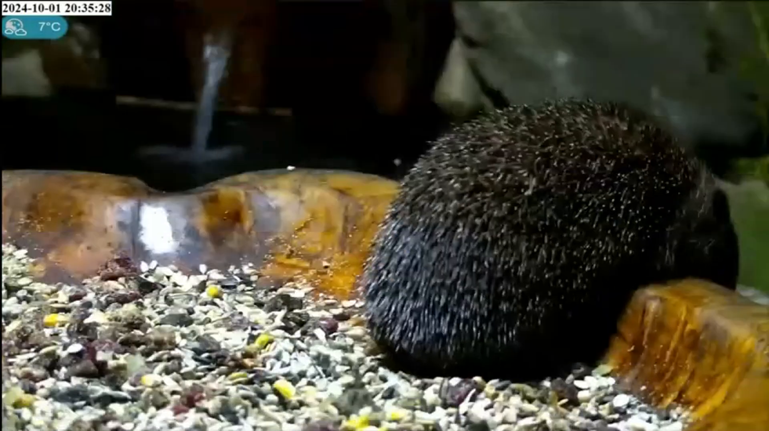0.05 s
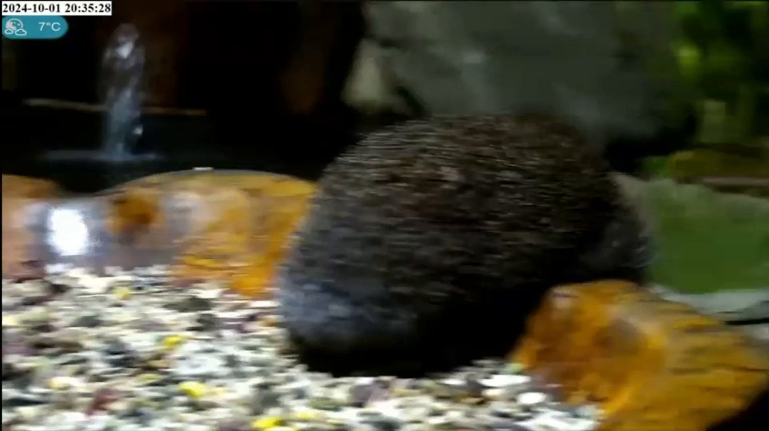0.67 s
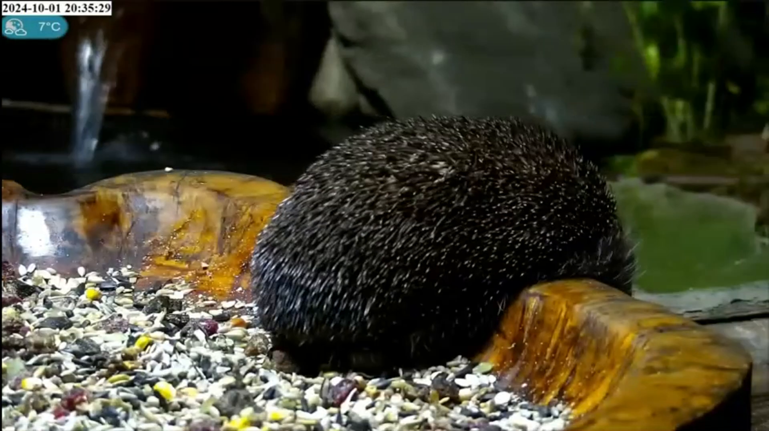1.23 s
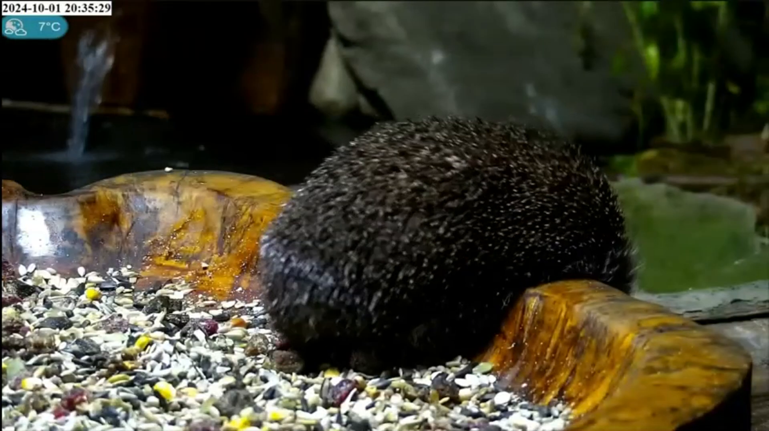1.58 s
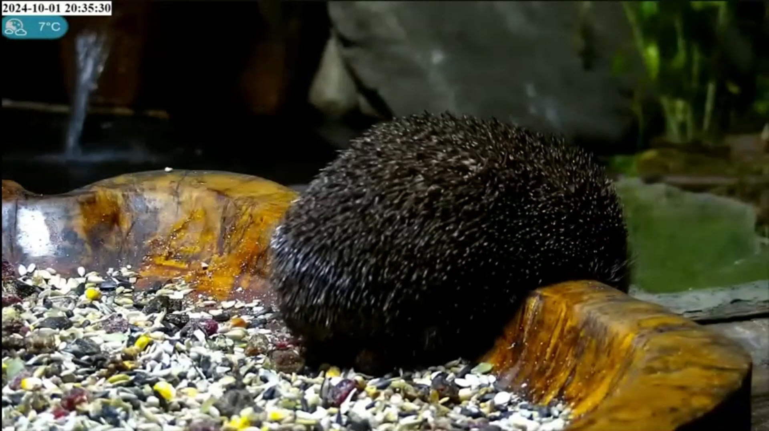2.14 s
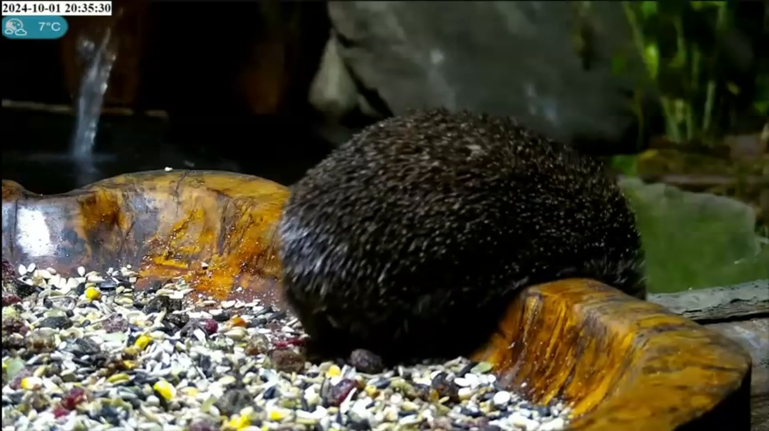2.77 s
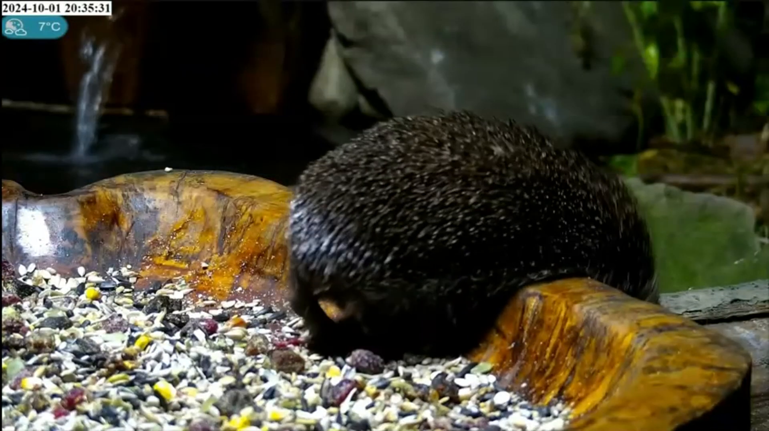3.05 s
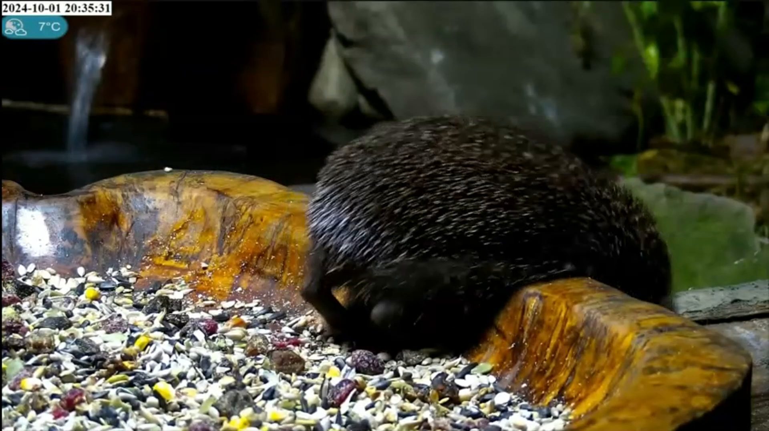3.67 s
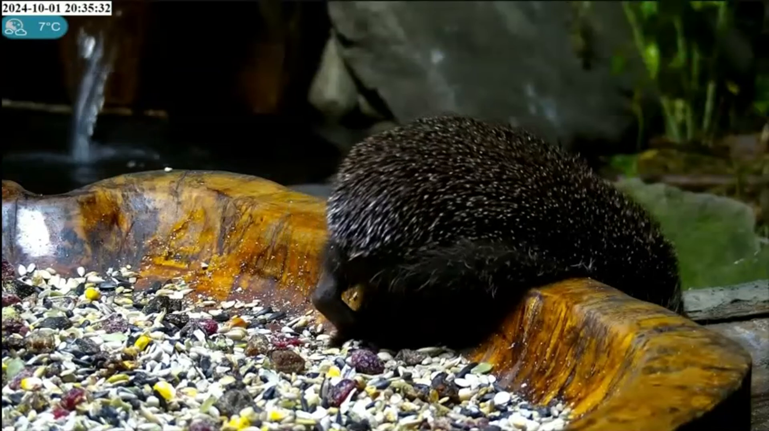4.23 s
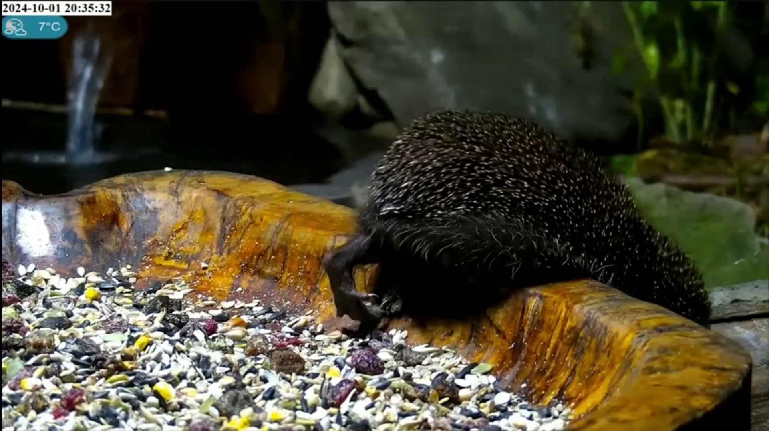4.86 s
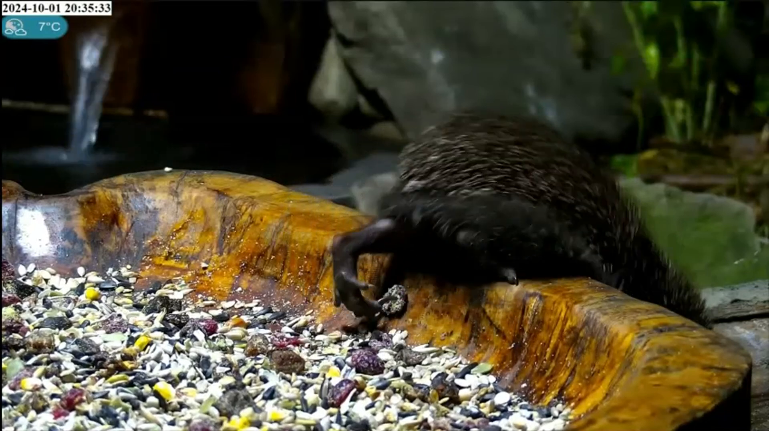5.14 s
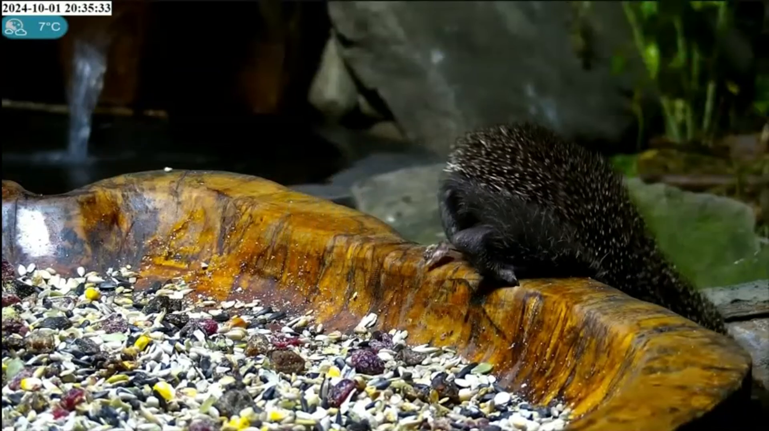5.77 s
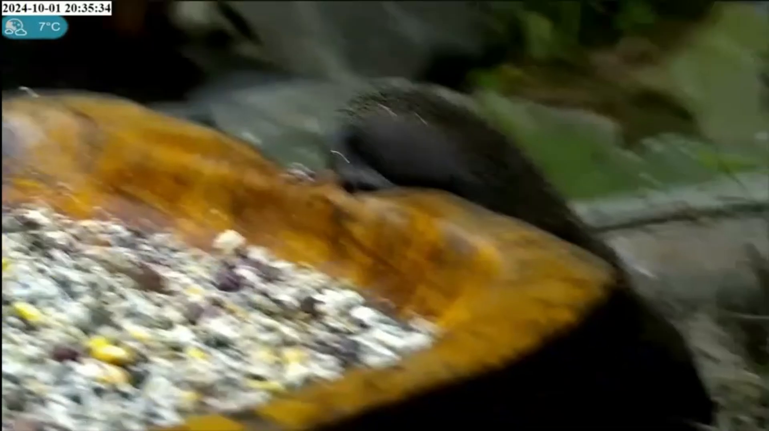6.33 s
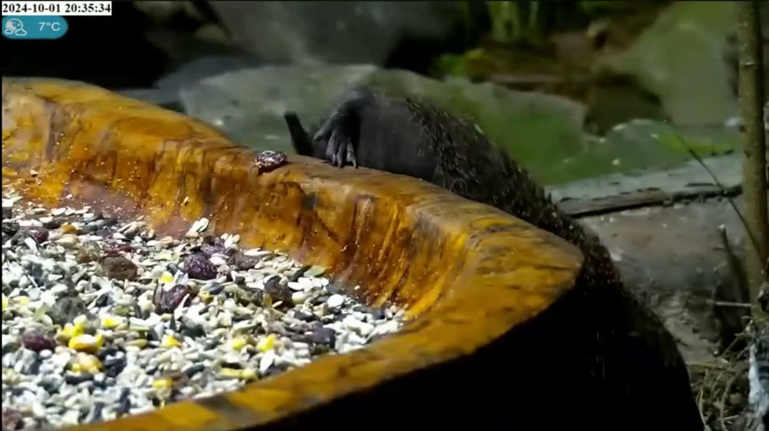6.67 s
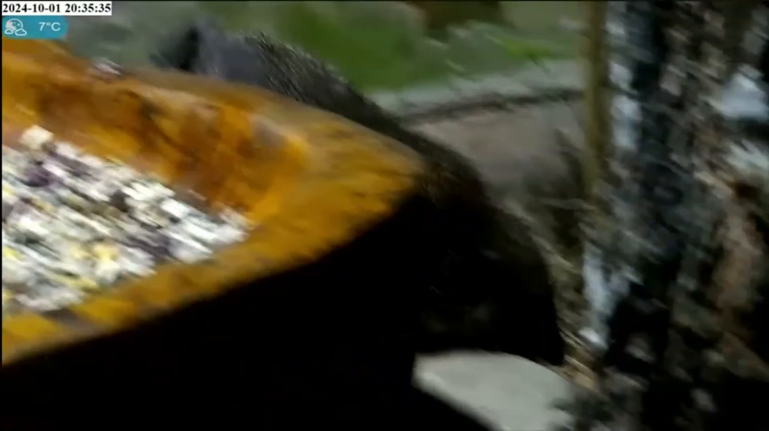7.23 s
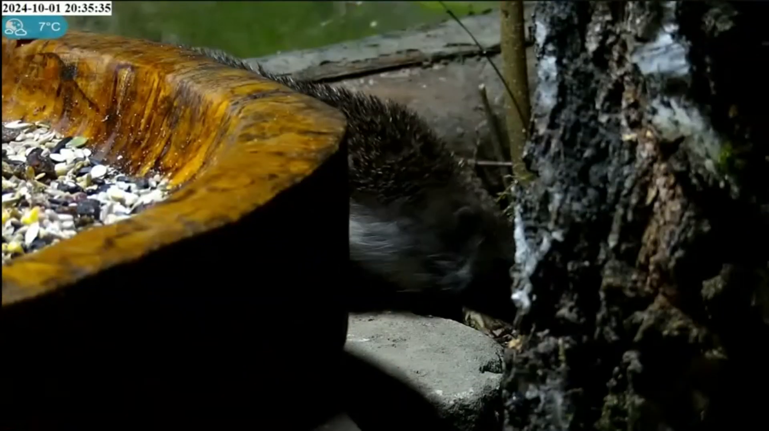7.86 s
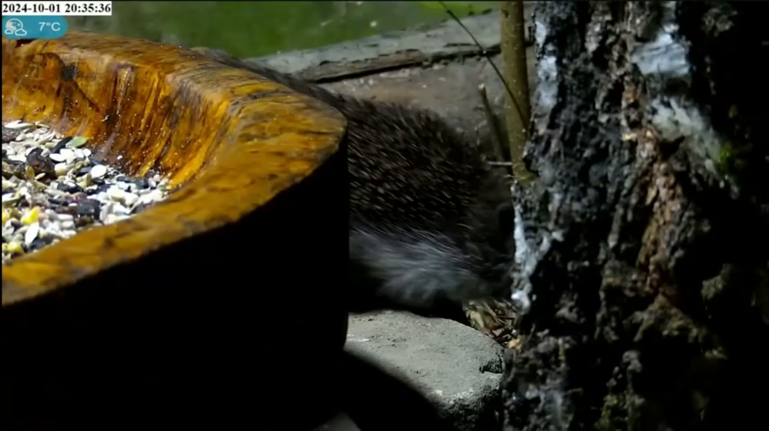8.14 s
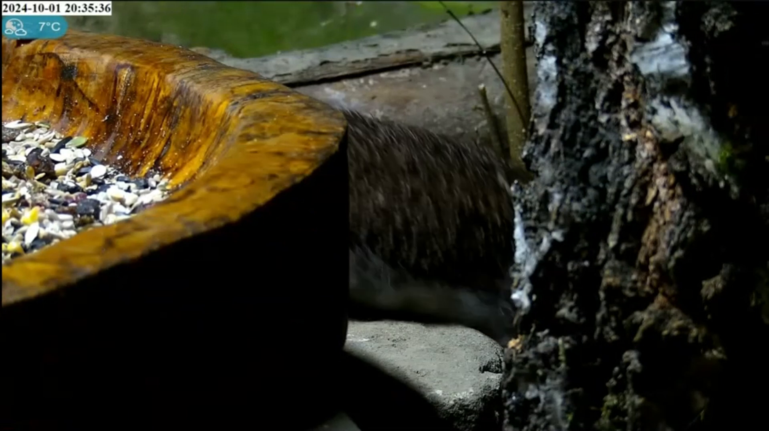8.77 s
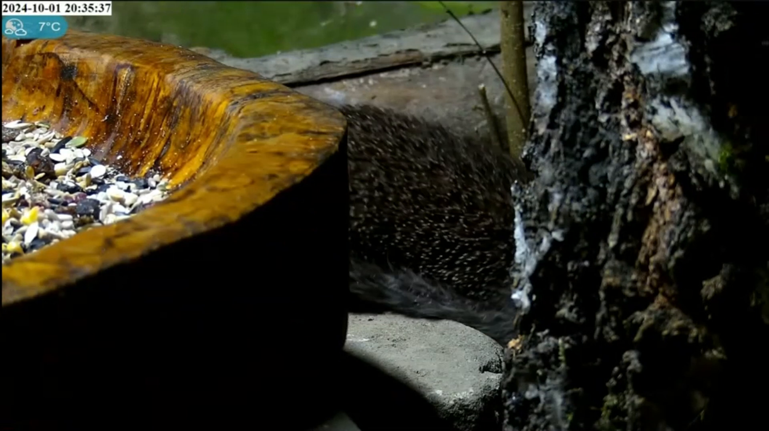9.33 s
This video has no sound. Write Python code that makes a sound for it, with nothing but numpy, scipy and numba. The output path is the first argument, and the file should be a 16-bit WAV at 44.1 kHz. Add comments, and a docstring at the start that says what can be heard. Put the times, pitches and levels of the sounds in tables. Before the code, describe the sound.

A thin, wobbling stream of water falls from a wooden trough into a small basin in a quiet garden. It trickles throughout in little gushes, with tiny high ringing bubbles, smacking drops and a fine hiss of spray. Now and then a soft, lower plop joins in. Near the end the stream thins briefly, then carries on. A small microphone nearby picks up little bass and a faint hum and whine.

```python
"""A quiet garden, close to a small basin fed from a wooden trough; small camera microphone, little bass.
From the start a thin, wobbling stream falls over mains hum and a faint whine, each gush driving a swarm
of tiny ringing bubbles under the surface and throwing fine spray. Single bubbles and smacking drops join
at once; from 0.5 s a larger air pocket plops now and then. The loudest bubbles ring near 4.8 s and 6.7 s.
The longest gush comes at 8.3 s, then the stream thins briefly and trickles on."""
import sys
import numpy as np
from scipy import signal
from scipy.fft import rfft, irfft, next_fast_len
from scipy.io import wavfile
from scipy.ndimage import uniform_filter1d
from numba import njit

SR = 44100
rng = np.random.default_rng(int(sys.argv[2]) if len(sys.argv) > 2 else 0)


def store_wav(level_fs):
    """Save 16-bit WAV to argv[1]."""
    pcm = np.round(np.clip(np.atleast_2d(level_fs), -1, 1) * 32767)
    wavfile.write(sys.argv[1], SR, pcm.T.astype(np.int16))


N = 414981
TIME = np.arange(N) / SR
STREAM_DB, STREAM_FINE_DB = -57, -4.5  # thread between gushes: strength, small bubbles over large

# low background of the garden: f/Hz, gain/dB
GARDEN_SPECTRUM = [(20, -0.5), (70, 4), (130, -2), (195, 2), (230, -7.5), (330, -11.5), (480, -17),
                   (6000, -30)]
# gushes from the trough: start t/s, length/s, strength/dB, small bubbles over large/dB
GUSHES = [(0.039, 0.06, -57, -4), (0.159, 0.06, -54, 4), (0.26, 0.02, -55, 5), (0.363, 0.095, -47.5, 5.5),
          (0.545, 0.025, -51, 3), (0.682, 0.06, -53, 1), (0.926, 0.06, -56, 36), (1.034, 0.131, -54, 7),
          (1.309, 0.11, -55, 7), (1.486, 0.1, -57, 4), (1.677, 0.095, -51, 1.5), (1.806, 0.045, -52, 12),
          (1.964, 0.08, -56, 10), (2.155, 0.138, -54, 6), (2.32, 0.044, -51, 23), (2.592, 0.08, -59.5, 7),
          (2.753, 0.069, -56, 4), (3.18, 0.034, -47, 8), (3.253, 0.09, -55.5, -5), (3.5, 0.18, -51, 5.5),
          (3.625, 0.04, -52, 7), (3.741, 0.022, -52, -4), (4.082, 0.08, -60, 2), (4.357, 0.06, -52, 5),
          (4.625, 0.088, -55, 13), (4.746, 0.156, -51, 6.5), (5.037, 0.16, -48, 21.5),
          (5.234, 0.051, -52, 3.5), (5.348, 0.016, -49, 43), (5.468, 0.18, -51, 1), (5.89, 0.016, -52, 33),
          (6.169, 0.025, -53, 13), (6.471, 0.043, -55, 3), (6.603, 0.113, -52, 0), (6.807, 0.048, -51, 2),
          (6.999, 0.055, -55, 10), (7.155, 0.089, -51, 7), (7.351, 0.112, -51, 18), (7.6, 0.07, -51.5, 4.5),
          (7.769, 0.035, -54, 0), (7.868, 0.08, -55, 10), (8.008, 0.148, -54, 9), (8.162, 0.15, -50.5, 4),
          (8.326, 0.31, -52, 8.5), (9.107, 0.025, -55, 0), (9.309, 0.09, -57, 6.5)]
# the thread of water thins and nearly breaks: middle t/s, length/s, depth/dB
LULLS = [(0.246, 0.05, -5), (0.506, 0.07, -6), (0.635, 0.06, -3.5), (1.263, 0.1, -4), (1.375, 0.05, -4),
         (1.924, 0.06, -3.5), (2.893, 0.07, -4), (3.038, 0.13, -5), (4.307, 0.09, -4), (4.558, 0.1, -2.5),
         (4.972, 0.06, -3), (5.323, 0.05, -6), (5.415, 0.08, -6), (5.858, 0.07, -4), (6.26, 0.11, -3),
         (7.092, 0.07, -8), (8.758, 0.22, -3)]
# colour of the bubble swarm and the splashes: f/Hz, gain/dB
SWARM_SPECTRUM = [(1000, -31), (1450, -16.5), (1750, -18), (1950, -2.5), (2250, -1.5), (2600, 0), (3300, 2),
                  (4200, 5), (4800, -2), (5700, 3.5), (6600, -15), (9000, -26.5), (13500, -44),
                  (15000, -56)]
# colour of the spray: f/Hz, gain/dB
SPRAY_SPECTRUM = [(400, -37), (750, -26), (1400, -27), (2000, 0.5), (4200, 0.5), (5700, -6.5), (6700, -8.5),
                  (8300, -11), (10300, -16.5), (10900, -22), (11600, -20), (14000, -27), (14900, -56)]
# resonances of the basin's air space: f/Hz, width/Hz, gain/dB
HOLLOW_MODES = [(537, 38, -1.5), (682, 24, -4.5), (831, 31, 2.5), (1053, 61, -7), (1225, 41, 1),
                (1530, 60, -4.5)]
# the loudest single bubbles: t/s, peak level/dB, f/Hz, life/cycles
LOUD_BUBBLES = [(0.119, -31, 3030, 8.2), (0.144, -36.5, 5550, 11), (0.182, -37.5, 4485, 8.1),
                (0.264, -34, 3080, 11.4), (0.375, -33, 4360, 2), (0.39, -35, 3550, 2.8),
                (0.556, -23.5, 5100, 4.5), (0.573, -38.5, 3980, 12), (0.705, -33, 5040, 8),
                (0.763, -36.5, 3660, 9.4), (0.867, -37, 4250, 5.9), (0.887, -34.5, 3940, 8.3),
                (0.939, -34.5, 4040, 6.5), (0.966, -35.5, 4240, 9), (0.983, -38, 4490, 6.5),
                (1.098, -39.5, 3150, 8), (1.155, -29, 4030, 6.6), (1.17, -38.5, 3300, 7),
                (1.337, -41.5, 2090, 7.4), (1.395, -35, 2095, 9.9), (1.514, -35, 3400, 5.2),
                (1.692, -32, 3320, 8.3), (1.754, -32, 4200, 6.5), (1.85, -31, 4340, 10.3),
                (1.952, -35, 5700, 7.1), (2.136, -38, 5800, 13), (2.171, -38.5, 4270, 11),
                (2.188, -32.5, 5150, 8), (2.261, -25.5, 3880, 3.5), (2.267, -30, 5600, 7.9),
                (2.332, -28, 4560, 7.3), (2.35, -31.5, 3770, 10), (2.373, -38.5, 3980, 17),
                (2.442, -39.5, 3790, 23), (2.768, -31.5, 3650, 8.3), (2.863, -40.5, 4040, 15),
                (2.928, -44, 3520, 5.3), (3.113, -32.5, 4090, 11), (3.284, -34.5, 3920, 15),
                (3.288, -36, 3950, 5), (3.312, -32, 5650, 8.8), (3.485, -28.5, 3350, 2.2),
                (3.517, -35.5, 5180, 8), (3.542, -33.5, 3830, 6.5), (3.55, -33.5, 2280, 6.6),
                (3.644, -31, 4020, 6.5), (3.701, -40.5, 3640, 17), (3.759, -35.5, 3900, 11),
                (3.853, -40, 4000, 13), (4.036, -35, 4500, 12), (4.185, -24.5, 3560, 4.3),
                (4.253, -26.5, 4160, 7), (4.378, -30, 5240, 4.2), (4.461, -36, 2160, 7.1),
                (4.677, -17.5, 4240, 4.3), (4.764, -38.5, 2040, 8.6), (4.789, -31, 4550, 7.5),
                (4.81, -40, 4510, 11), (4.821, -17, 4000, 7.2), (4.887, -36, 2320, 8.7),
                (5.069, -21, 3620, 2.5), (5.093, -34, 3760, 8), (5.14, -35, 3900, 7.3),
                (5.153, -30.5, 3800, 7.2), (5.197, -30, 4050, 4.1), (5.255, -39.5, 3440, 12),
                (5.284, -37, 2410, 6.4), (5.289, -31, 5000, 4.6), (5.366, -32.5, 4330, 11),
                (5.502, -28.5, 4140, 5.7), (5.518, -40, 3650, 12), (5.537, -30, 4130, 4.6),
                (5.561, -30.5, 4550, 5.9), (5.585, -30, 4160, 4.9), (5.616, -34.5, 3560, 12),
                (5.712, -40, 2340, 6.8), (5.722, -36.5, 2530, 8), (5.899, -34, 5050, 13),
                (5.999, -36, 4400, 5.3), (6.094, -41, 2220, 13), (6.19, -28.5, 4150, 4.1),
                (6.489, -30, 3430, 6.7), (6.586, -34, 3580, 6.4), (6.626, -32, 3040, 8.1),
                (6.69, -17.5, 4235, 9.4), (6.829, -25, 4540, 3.5), (6.841, -30, 4270, 11),
                (6.893, -35, 4490, 11), (7.035, -27, 5230, 4), (7.202, -22.5, 4200, 6),
                (7.219, -28, 4070, 7.8), (7.384, -31, 4590, 5), (7.414, -26.5, 4330, 5.3),
                (7.448, -27, 4330, 5.2), (7.565, -42, 2056, 16), (7.702, -38, 5560, 9.2),
                (7.75, -36, 3410, 6.3), (7.893, -36, 3350, 8), (7.906, -31.5, 5500, 3.7),
                (8.032, -28.5, 3420, 4.6), (8.119, -36, 4030, 8.9), (8.146, -36, 3760, 6),
                (8.153, -33, 4350, 7.2), (8.192, -39, 3960, 4), (8.201, -21.5, 3830, 2.9),
                (8.205, -25.5, 4580, 3.5), (8.247, -32.5, 3940, 7.2), (8.266, -38, 3200, 15),
                (8.356, -42, 5470, 12), (8.487, -38.5, 3570, 12), (8.581, -44.5, 2010, 7.1),
                (8.613, -36, 3850, 8), (8.867, -35.5, 4150, 7), (8.906, -34, 5450, 8),
                (8.981, -30, 4080, 4.9), (9.017, -36, 3620, 7.4), (9.115, -36.5, 4090, 12),
                (9.251, -37, 3220, 8.8), (9.373, -36.5, 3580, 4.8)]
# drops that smack the surface with no clear note: t/s, relative level/dB
SMACKS = [(0.125, -51), (0.385, -36.5), (1.125, -43), (1.823, -49), (1.835, -37), (2.111, -40.5),
          (2.356, -39.5), (2.488, -41.5), (2.537, -42), (2.724, -43), (2.772, -45), (2.816, -40.5),
          (2.928, -39), (3.201, -41.5), (3.363, -40), (3.458, -40.5), (3.634, -41), (3.654, -50),
          (3.81, -49), (3.876, -43), (4.687, -41), (4.828, -48), (4.845, -41), (4.887, -43), (5.066, -37.5),
          (5.103, -41), (5.168, -36), (5.37, -44), (5.476, -46.5), (5.905, -42), (6.412, -45.5),
          (6.645, -39), (6.831, -37), (6.854, -48.5), (6.962, -43), (7.047, -43), (7.12, -44.5),
          (7.18, -40.5), (7.199, -36), (7.35, -45.5), (7.472, -40), (7.61, -38.5), (7.789, -42.5),
          (8.056, -43), (8.231, -37.5), (8.494, -44), (8.905, -44), (9.15, -42)]
# large air pockets: t/s, relative level/dB, f/Hz
AIR_POCKETS = [(0.519, -57.5, 531), (0.828, -64, 894), (0.922, -59.5, 1075), (1.205, -63, 663),
               (1.251, -63, 733), (1.473, -64, 803), (1.578, -60, 800), (1.824, -58.5, 852),
               (2.105, -63, 660), (2.35, -65, 558), (2.468, -56, 993), (2.77, -62, 1350), (3.203, -68, 866),
               (3.279, -66, 540), (3.811, -54.5, 1220), (3.887, -68.5, 652), (4.556, -58, 920),
               (4.799, -61, 1000), (4.911, -54.5, 805), (5.426, -58, 610), (5.59, -63.5, 840),
               (5.642, -64, 814), (5.972, -59.5, 607), (6.831, -64, 1064), (7.103, -65, 840),
               (7.281, -47, 660), (8.033, -65, 1360), (8.35, -68, 674), (8.493, -53.5, 845),
               (8.567, -62.5, 776), (8.612, -57.5, 1180), (9.161, -60.5, 676), (9.313, -57, 1330)]
# mains hum and whine of the camera's electronics: f/Hz, rms level/dB
HUM_TONES = [(50, -71.2), (100, -76.5), (150, -95), (250, -94.5), (300, -102), (350, -100), (10500, -89.5),
             (12000, -88)]


def undb(db):
    """Decibels to gain."""
    return 10 ** (np.asarray(db) / 20)


def level(x, db):
    """Set the rms level."""
    return x * undb(db) / np.sqrt(np.mean(x ** 2))


def colour(x, points):
    """Filter by a spectrum of f/Hz, gain/dB points."""
    hz, db = np.transpose(points)
    size = next_fast_len(N + SR // 10)
    bins = np.maximum(np.fft.rfftfreq(size, 1 / SR), 1)
    gain = undb(np.interp(np.log(bins), np.log(hz), db))
    return irfft(rfft(x, size) * gain, size)[:N]


def walk(per_s):
    """Smooth random wander with a spread of 1."""
    hold = max(int(SR / per_s), 2)
    steps = np.repeat(rng.standard_normal(N // hold + 1), hold)[:N]
    smooth = uniform_filter1d(steps, hold)
    return smooth / smooth.std()


def add(out, s, sound):
    """Mix a sound in at time s."""
    start = int(np.clip(s * SR, 0, N))
    out[start:start + len(sound)] += sound[:N - start]


def moments(density, shares):
    """Turn shares 0-1 into times that crowd where the density is high."""
    total = np.cumsum(density)
    return np.interp(shares, total / total[-1], TIME)


def garden():
    """The ambience of the place: a faint, steady low noise."""
    return level(colour(rng.standard_normal(N), GARDEN_SPECTRUM), -82.5)


def stream(attack_s=.015, release_s=.015, neck_db=-2.0, neck_s=.028):
    """Strength/dB and fineness/dB of the falling water: a quivering thread with lulls and gushes."""
    flow = np.full(N, undb(STREAM_DB))
    fine = flow * STREAM_FINE_DB
    for start, length, db, fine_db in GUSHES:
        age = TIME - start
        drain = np.exp(-np.clip((age - length) / release_s, 0, 20))
        gush = undb(db) * np.clip(age / attack_s, 0, 1) * drain
        flow += gush
        fine += gush * fine_db
    quiver_db = 1.9 * np.minimum(walk(per_s=25), 1.5)
    for s, *_ in LOUD_BUBBLES + SMACKS:  # the thread thins before it breaks into a loud drop
        add(quiver_db, s - neck_s, neck_db * np.hanning(int(neck_s * SR)))
    for s, length, depth_db in LULLS:
        add(quiver_db, s - length / 2, depth_db * np.hanning(int(length * SR)))
    unsteady = undb(STREAM_DB) / flow  # a full stream is steadier
    return 20 * np.log10(flow) + unsteady * quiver_db, fine / flow


@njit
def ring(times, hz, cycles, size, glide, swell):
    """Each bubble swells as it pinches off, rings out, and rises in pitch as it nears the surface."""
    out = np.zeros(N)
    for k in range(len(times)):
        life = cycles[k] / hz[k]
        start, phase = int(times[k] * SR), 0.
        for i in range(min(int(5 * life * SR), N - start)):
            age = i / SR / life
            phase += 2 * np.pi * hz[k] * (1 + glide[k] * age) / SR
            envelope = (1 - np.exp(-(age / swell) ** 2)) * np.exp(-age)
            out[start + i] += size[k] * envelope * np.sin(phase)
    return out


def swarm(flow_db, count=6500, low_hz=1550, high_hz=6500, spread_db=5.0):
    """Tiny bubbles under the surface; a stronger gush makes both more and louder ones."""
    when, pitch, length, rise = rng.random((count, 4)).T
    scatter_db = spread_db * np.clip(rng.standard_normal(count), -3, 1.5)
    times = moments(undb(.6 * flow_db), when)
    hz = low_hz * (high_hz / low_hz) ** pitch
    size = undb(scatter_db + .63 * np.interp(times, TIME, flow_db))
    cycles = 5.87 * 2 ** (2 * length - .5 - pitch)  # large bubbles ring for more cycles
    rings = ring(times, hz, cycles, size, glide=.024 * rise, swell=.31)
    flow_rms = np.sqrt(np.mean(undb(flow_db) ** 2))
    return level(colour(rings, SWARM_SPECTRUM), -4) * flow_rms


def froth(patchy_db=9.5):
    """Merging bubbles: the prevailing sizes keep changing, so narrow noise bands swell and fade."""
    edges_hz = 1500 * 2 ** np.linspace(0, 2.2, 15)
    bands = np.zeros(N)
    for low, high in zip(edges_hz, edges_hz[1:]):
        bandpass = signal.butter(2, [low, high], "bandpass", fs=SR, output="sos")
        band = signal.sosfilt(bandpass, rng.standard_normal(N))
        gain = undb(patchy_db * np.minimum(walk(per_s=70), 1.3))
        bands += band * level(gain, 0)
    outside = signal.butter(2, edges_hz[[0, -1]], "bandstop", fs=SR, output="sos")
    return bands + signal.sosfilt(outside, rng.standard_normal(N))


def splash(flow_db, bubbles, count=2200, spread_db=7.5, burst_s=.0021, kick_s=.0014, lead_s=.00074):
    """Drops land in bursts of fizz; one that traps a clear bubble kicks up a splash as it lands."""
    density = undb(.5 * flow_db)
    times = moments(density, rng.random(count))
    drop_db = spread_db * np.clip(rng.standard_normal(count), -3, 2)
    drops, kicks = np.zeros(N), np.zeros(N)
    np.add.at(drops, (times * SR).astype(int), undb(drop_db) ** 2)
    for s, peak_db, _, _ in bubbles:
        add(kicks, s - lead_s, undb([min(peak_db, -29) - 16]) ** 2)
    # the power of every burst dies away exponentially
    patter = signal.lfilter([1], [1, -np.exp(-1 / (burst_s * SR))], drops) / density
    kick_power = signal.lfilter([1], [1, -np.exp(-1 / (kick_s * SR))], kicks + 1e-18)
    wash = .032 * undb(.56 * (flow_db - STREAM_DB))  # in a strong gush the drops merge
    power = (patter / patter.mean() + wash) * undb(flow_db - 2.44) ** 2 + kick_power
    return colour(np.sqrt(power) * froth(), SWARM_SPECTRUM)


def break_up(x, fine_db, split_hz=3100, large_share=.96, wander_db=2.5):
    """A finely broken stream favours small, high bubbles; a smooth one large, low bubbles."""
    tilt_db = fine_db + wander_db * walk(per_s=14)
    large = signal.sosfiltfilt(signal.butter(3, split_hz, fs=SR, output="sos"), x)
    small = x - large
    return large * undb(-large_share * tilt_db) + small * undb((1 - large_share) * tilt_db)


def spray(flow_db, tick_db=6, tick_s=.0039, specks=200, speck_db=3.5, speck_s=.003):
    """Droplets patter, steadier than the gushes; loud drops and stray specks add bright ticks."""
    ticks_db, specks_db = np.zeros(N), np.zeros(N)
    for s, *_ in LOUD_BUBBLES + SMACKS:
        add(ticks_db, s - tick_s / 2, tick_db * np.hanning(int(tick_s * SR)))
    when, sizes = rng.random((specks, 2)).T
    for s, size in zip(moments(undb(.5 * flow_db), when), sizes):
        add(specks_db, s, speck_db * (1 + 2 * size ** 3) * np.hanning(int(speck_s * SR)))
    ticks_db = np.maximum(ticks_db, np.minimum(specks_db, 3 * speck_db))
    hiss = rng.standard_normal(N)
    flicker_db = 2 * walk(per_s=600) + walk(per_s=35)
    patter = hiss * undb(.055 * flow_db + flicker_db + ticks_db)
    return level(colour(patter, SPRAY_SPECTRUM), -60.5)


def hollow(x, open_db=-11):
    """The basin's air space rings with low resonances; some sound reaches the microphone openly."""
    resonances = sum(undb(db) * signal.lfilter(*signal.iirpeak(hz, hz / width, fs=SR), x)
                     for hz, width, db in HOLLOW_MODES)
    return resonances + undb(open_db) * x


def gurgle(flow_db, count=800, low_hz=600, spread_db=4.5, surge_db=3.5):
    """Bubbles of many sizes churn softly under the stream, in bouts, and stir the hollow."""
    when, pitch, rise = rng.random((count, 3)).T
    size = undb(spread_db * np.minimum(rng.standard_normal(count), 2))
    cycles = 3.34 * (1 + rise)
    churn = ring(when * N / SR, low_hz * 2.9 ** pitch, cycles, size, glide=.033 * rise, swell=1.)
    bouts = undb(.17 * flow_db + surge_db * np.minimum(walk(per_s=7), 1))
    return level(hollow(churn * bouts), -86)


def basin(x, wet_db=-10.5, t60_s=.068):
    """Rim and stones scatter the sound back to the microphone within a few hundredths of a second."""
    t = np.arange(SR // 4) / SR
    echoes = rng.standard_normal(len(t)) * undb(-60 * t / t60_s) * (t > .003)
    return x + undb(wet_db) * signal.fftconvolve(x, echoes / np.linalg.norm(echoes))[:N]


def stray_bubbles(flow_db, count, hz, octaves, cycles, db, spread_db, crowding, follow):
    """Rows like LOUD_BUBBLES, around one size; a stronger stream traps more and louder ones."""
    when, pitch, length, size = rng.random((count, 4)).T
    times = moments(undb(crowding * flow_db), (np.arange(count) + when) / count)
    gush_db = np.interp(times, TIME, flow_db) - STREAM_DB
    peak_db = db + spread_db * (2 * size - 1) + follow * gush_db
    stray_hz = hz * 2 ** (octaves * (pitch - .5))
    return np.column_stack([times, peak_db, stray_hz, cycles * 2 ** (length - .5)])


def companions(bubbles, gap_s, db, octaves, cap_db, early_share=.39, low_hz=1850, high_hz=5900):
    """Bubbles come in pairs: rows for a second one of similar size, just before or after each."""
    s, peak_db, hz, cycles = np.transpose(bubbles)
    delay, pitch, size = rng.random((len(s), 3)).T
    times = s + 2 * gap_s * (delay - early_share)
    paired_db = np.minimum(peak_db, cap_db) + db * (.5 + size)
    detuned_hz = hz * 2 ** (octaves * (pitch - .5))
    paired_hz = np.minimum(low_hz + np.abs(detuned_hz - low_hz), high_hz)
    return np.column_stack([times, paired_db, paired_hz, cycles * (1 + size / 2)])


def clear_bubbles(bubbles, octave=.46, twelfth=.41):
    """Single bubbles swell, die within cycles and leave a weak ring; the strongest sound overtones."""
    out = np.zeros(N)
    for s, peak_db, hz, cycles in bubbles:
        life = max(cycles, 3) / hz
        age = np.arange(int(8 * life * SR)) / SR / life - 2  # in lives from the peak
        pulse = np.exp(-np.abs(age / .5) ** 2.32)
        tail = .05 * np.exp(-np.abs(age - 1) / 1.7) * np.clip(age, 0, 1)
        rise = .054 * rng.random()  # shallow bubbles rise in pitch, deep ones hardly
        phase = 2 * np.pi * hz * life * (age + rise * age ** 2 / 2)
        wave = undb(peak_db) * (pulse + tail) * np.exp(1j * phase)
        add(out, s - 2 * life, np.real(wave + octave * wave ** 2 + twelfth * wave ** 3))
    return out


def smacks(gain_db=-2.0, fizz_s=.0013, tail_s=.0044, centre_hz=4200, octaves=.47):
    """A drop smacks the surface: a sharp burst of fizz with its own colour and a short frothy tail."""
    out = np.zeros(N)
    age = np.arange(SR // 32) / SR
    envelope = age / fizz_s * np.exp(1 - age / fizz_s) + .11 * np.exp(-age / tail_s)
    for s, db in SMACKS:
        hz = centre_hz * 2 ** (octaves * (rng.random() - .5))
        fizz = signal.lfilter(*signal.iirpeak(hz, Q=2.6, fs=SR), rng.standard_normal(len(age)))
        burst = fizz * envelope
        add(out, s - fizz_s, burst * undb(db + gain_db) / burst[:int(3 * fizz_s * SR)].std())
    coloured = colour(out, SWARM_SPECTRUM)
    return coloured * out.std() / coloured.std()


def plops(cycles=6.7, glide=.012, ring_db=2.0, gulp_db=1.0, gulp_s=.00767):
    """Large air pockets ring low; the rough gulp of each collapse stirs the basin's hollow."""
    s, db, hz = np.transpose(AIR_POCKETS)
    starts = s - gulp_s / 2
    each = np.ones(len(s))
    rings = ring(starts, hz * (1 - glide), cycles * each, undb(db + ring_db), glide * each, swell=.6)
    age = np.arange(SR // 10) / SR / gulp_s
    gulps = np.zeros(N)
    for start, pocket_db, pocket_hz in zip(starts, db, hz):
        churn = signal.lfilter(*signal.iirpeak(pocket_hz, Q=6.6, fs=SR), rng.standard_normal(len(age)))
        add(gulps, start, level(churn, pocket_db + gulp_db) * age * np.exp(-age))
    return rings + hollow(gulps)


def scene():
    """What reaches the microphone, in mono: the trickle in its basin, the garden behind it."""
    flow_db, fine_db = stream()
    small = stray_bubbles(flow_db, count=120, hz=4120, octaves=1.0, cycles=7.0,
                          db=-43.5, spread_db=2.5, crowding=.74, follow=.53)
    large = stray_bubbles(flow_db, count=60, hz=2190, octaves=.34, cycles=11.8,
                          db=-50.0, spread_db=1.0, crowding=.25, follow=.35)
    trapped = np.vstack([LOUD_BUBBLES, small, large])
    beside_loud = companions(LOUD_BUBBLES, gap_s=.0093, db=-9.5, octaves=.79, cap_db=-32)
    beside_large = companions(large, gap_s=.0098, db=1.0, octaves=.26, cap_db=-44)
    bubbles = np.vstack([trapped, beside_loud, beside_large])
    trickle = break_up(swarm(flow_db) + splash(flow_db, trapped), fine_db)
    water = trickle + smacks() + clear_bubbles(bubbles) + plops() + gurgle(flow_db)
    return (basin(water) + spray(flow_db) + garden())[None]


def record(dry, top_hz=15500):
    """Behind the microphone, the camera's electronics add hum and whine and cut the top."""
    hum = sum(np.sqrt(2) * undb(db) * np.sin(2 * np.pi * (hz * TIME + rng.random()))
              for hz, db in HUM_TONES)
    lowpass = signal.ellip(8, .2, 70, top_hz, fs=SR, output="sos")
    return signal.sosfilt(lowpass, dry + hum)


dry = scene()
out = record(dry)
store_wav(out)
```